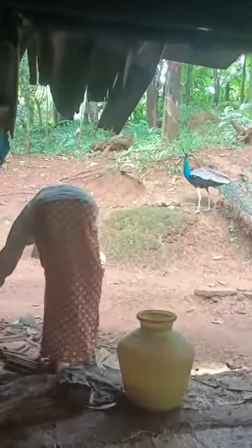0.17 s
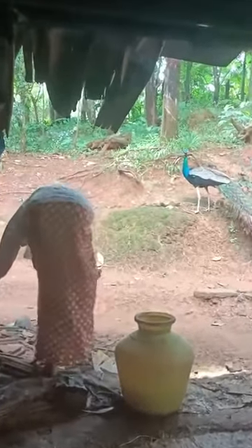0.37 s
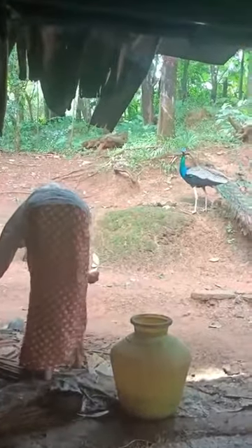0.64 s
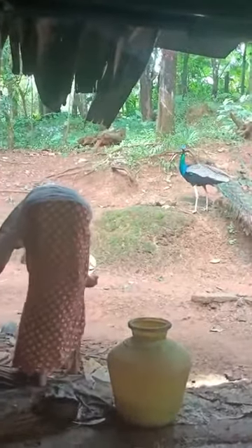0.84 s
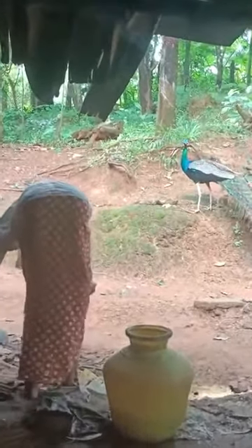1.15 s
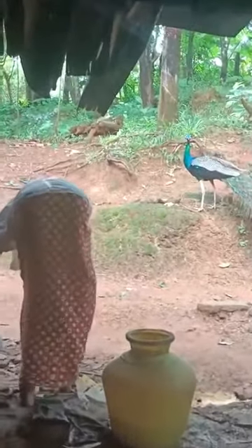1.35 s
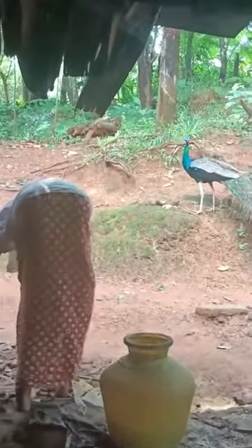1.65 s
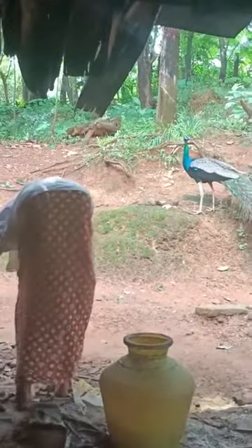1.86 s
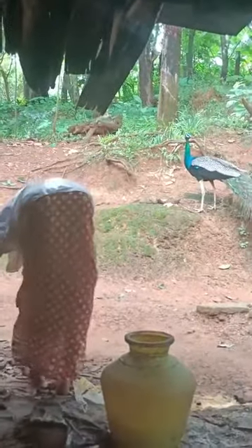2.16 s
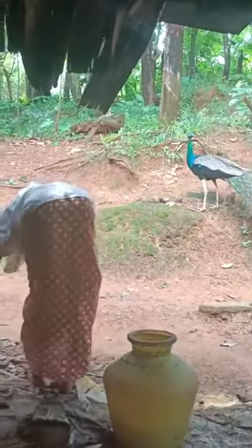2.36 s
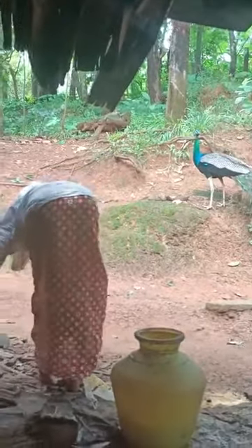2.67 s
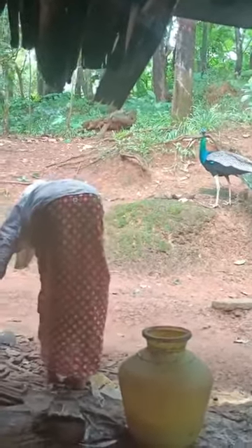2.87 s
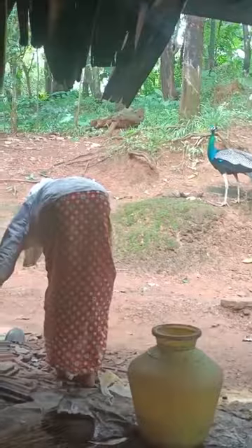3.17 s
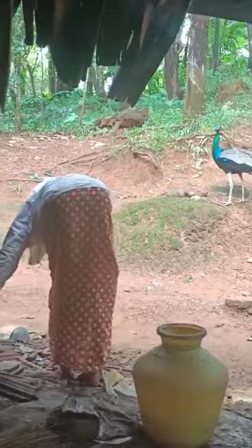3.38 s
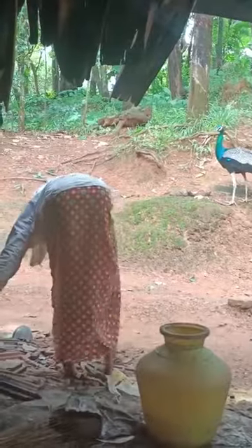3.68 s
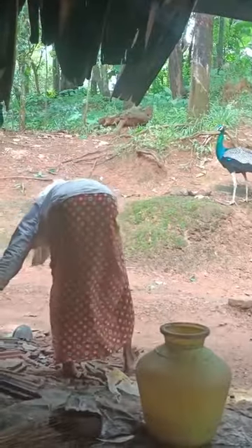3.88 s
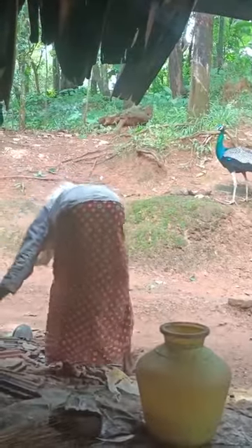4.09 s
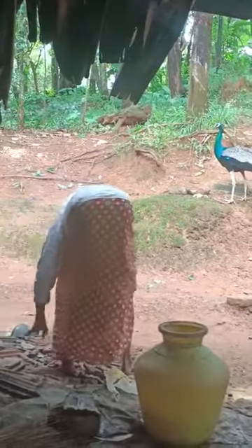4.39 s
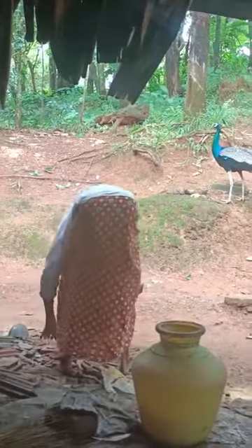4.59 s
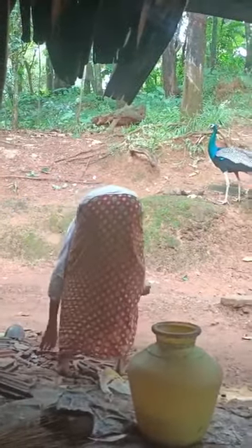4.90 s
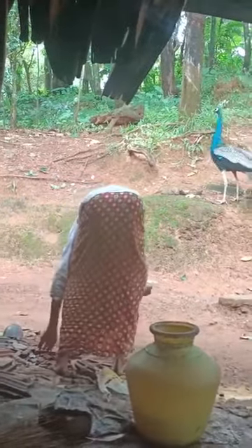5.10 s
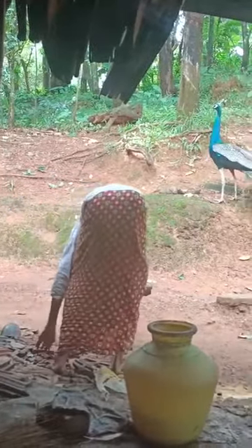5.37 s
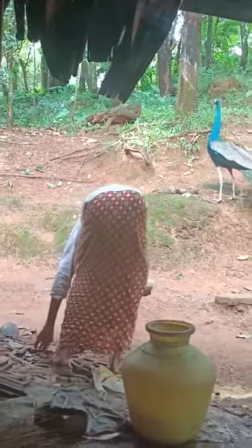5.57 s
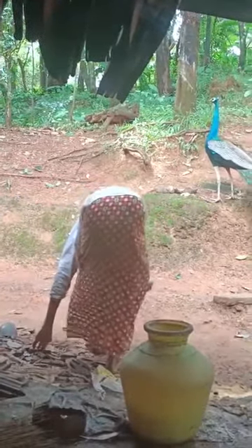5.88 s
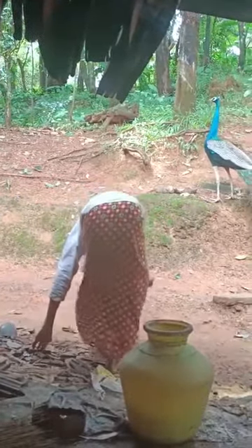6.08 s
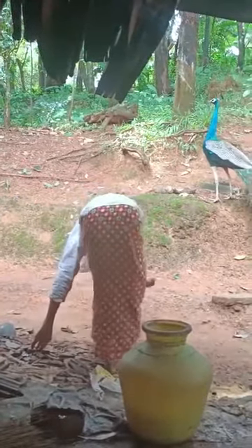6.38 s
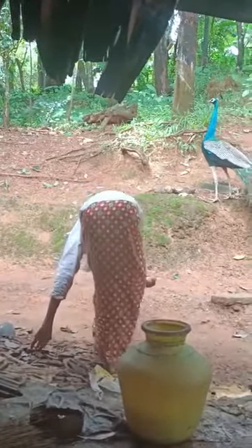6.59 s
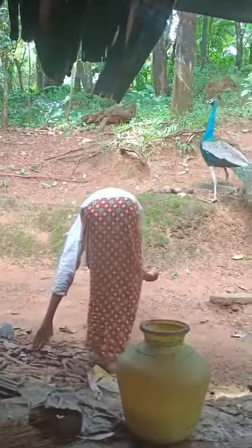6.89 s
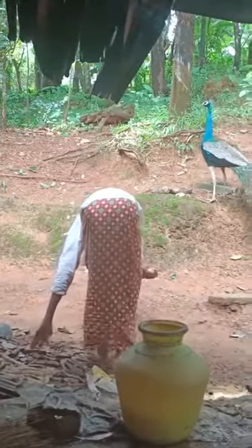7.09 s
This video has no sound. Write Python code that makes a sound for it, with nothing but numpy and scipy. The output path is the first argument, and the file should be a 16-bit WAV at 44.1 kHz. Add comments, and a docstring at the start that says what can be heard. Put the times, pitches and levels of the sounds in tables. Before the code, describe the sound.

A quiet outdoor yard heard from under a small shelter: steady soft leaf hiss with a faint low rumble, and short echoes around the birds. A close chick is already peeping at 0 seconds and peeps again at 0.4, a clear whistle near 5 kHz breaking and sliding to about 3 kHz. A low, hoarse hen clucks softly at 0.2, 1.2 and 1.7, then irregularly to the end, while further chicks give weaker, reedier peeps. A thin high hiss passes at 0.65. From 2.1 the near chick peeps steadily, at about 2.6, 3.3, 4.0, 4.7, 5.2, 6.3 and 6.8. Feet scuff dry litter faintly at 3.2 and more clearly at 3.6; a small twig crackles at 3.9. A faint scuff at 4.9 leads to a sharp, bright double snap at 5.0, then another thin hiss at 5.3. Peeps and clucks continue to the end.

```python
"""Under a lean-to in a quiet yard, trees hiss and a chick close by is already peeping as the scene opens.
From the first second a hen clucks softly, other chicks answer further off and a thin, high hiss passes;
from about two seconds the near chick peeps on steadily. Feet scuff dry litter past three seconds, a twig
snaps just before four, and near five come a scuff, a sharper snap and a second thin hiss. Chicks are
gliding whistles, the hen rings resonances, the rest is shaped noise; echoes answer, two ports listen."""
import sys
import numpy as np
from scipy import signal
from scipy.fft import rfft, irfft
from scipy.io import wavfile
from scipy.ndimage import uniform_filter1d

SR = 44100
rng = np.random.default_rng(int(sys.argv[2]) if len(sys.argv) > 2 else 0)


def log_audio(samples):
    """Write samples as a 16-bit WAV file to the path given in sys.argv[1]."""
    # one column per channel
    frames = np.atleast_2d(samples).T
    # limit to full scale, then quantise
    limited = np.clip(frames, -1, 1)
    pcm = np.round(limited * 32767).astype(np.int16)
    wavfile.write(sys.argv[1], SR, pcm)


N = 319725
EDGE_HZ = 15900  # top of the recorded band


def gain_of(db):
    """Decibels to an amplitude factor."""
    return 10 ** (np.asarray(db) / 20)


def evened(x):
    """Scales to rms 1."""
    return x / np.sqrt(np.mean(x ** 2) + 1e-20)


def read(points, hz):
    """Reads a table of frequency points on a log-frequency axis."""
    f, value = np.transpose(points)
    return np.interp(np.log(hz + 1), np.log(f + 1), value)


def add(mix, s, sound, pan_db):
    """Lays a sound into both channels; pan_db is left minus right."""
    at = round(s * SR)
    sound = sound[max(-at, 0):]
    part = mix[:, max(at, 0):][:, :len(sound)]
    part += gain_of([[pan_db / 2], [-pan_db / 2]]) * sound[:part.shape[1]]


def coloured(x, points):
    """Filters a signal by the spectrum of the table, then scales to rms 1."""
    colour = gain_of(read(points, np.fft.rfftfreq(len(x), 1 / SR)))
    return evened(irfft(rfft(x) * colour, len(x)))


def resonate(x, hz, width_hz):
    """Shifts the curve hz down to zero, smooths, and shifts back: a resonance of gain 1."""
    turn = np.exp(2j * np.pi * np.cumsum(hz) / SR)
    r = np.exp(-np.pi * width_hz / SR)
    return 2 * (turn * signal.lfilter([1 - r], [1, -r], x / turn)).real


def resonate_twice(x, hz, width_hz):
    """Two equal resonances in a row, for steeper skirts."""
    return resonate(resonate(x, hz, width_hz), hz, width_hz)


def columns(rows):
    """Joins the corners of a call into smoothed curves at the sample rate."""
    s, *values = np.transpose(rows)
    t = np.arange(s[0], s[-1], 1 / SR)
    return [uniform_filter1d(np.interp(t, s, v), size=150) for v in values]


def later(x, seconds):
    """Delays a signal by turning the phase of each frequency."""
    return irfft(rfft(x) * np.exp(-2j * np.pi * np.fft.rfftfreq(N, 1 / SR) * seconds), N)


# colour of the yard: (frequency [Hz], relative level per Hz [dB])
YARD_COLOUR = [(12, -14), (25, -3), (90, -1), (320, -4), (480, -4), (800, -9), (1600, -10), (2500, -4),
               (3450, -5), (4700, -6.5), (5800, -5), (6700, -11), (9600, -16), (13200, -15.5), (14500, -24),
               (15000, -26), (15900, -55)]
# left-right likeness of the yard: (frequency [Hz], correlation [-1 to 1])
YARD_LIKENESS = [(60, .99), (170, .9), (500, .66), (900, .28), (1300, 0), (1700, -.2), (2300, 0)]
# stereo balance of the yard: (frequency [Hz], left minus right [dB])
YARD_BALANCE = [(500, 0), (1400, 4), (2500, 1.5), (5500, 2), (7300, -3), (9000, 0), (11500, 3), (14000, 0)]
YARD_DB = -43.5  # rms over both channels


def yard():
    """Hiss of leaves and distant rumble: random short-time spectra with faint patches and a slow swell."""
    frames, hz = N // 256 + 5, np.fft.rfftfreq(1024, 1 / SR)
    a, b, c, d, patches = rng.standard_normal((frames, 513, 5)).T
    patches = uniform_filter1d(patches, size=10, axis=0)
    patches = evened(uniform_filter1d(patches, size=12, axis=1))
    t = np.arange(frames) * 256 / SR
    swell = evened(sum(np.sin(2 * np.pi * (f * t + rng.random())) / np.sqrt(f)
                       for f in np.geomspace(.15, 4, num=20)))
    same = read(YARD_LIKENESS, hz)[:, None]
    left = a + 1j * b
    right = same * left + np.sqrt(1 - same ** 2) * (c + 1j * d)
    lean = gain_of(read(YARD_BALANCE, hz) / 2)[:, None]
    level_db = read(YARD_COLOUR, hz)[:, None] + 1.2 * patches + .5 * swell
    spectra = np.array([left * lean, right / lean]) * gain_of(level_db)
    return gain_of(YARD_DB) * evened(signal.istft(spectra, nperseg=1024, noverlap=768)[1][:, :N])


# decay of the echoes off roof and walls: (frequency [Hz], time to fall by 60 dB [s])
SHELTER_DECAY = [(300, .24), (3000, .21), (8000, .19), (15000, .16)]


def shelter(x):
    """Sparse echoes of random sign, dying band by band; three tails trade places as if the birds moved."""
    out, size = np.zeros((2, N)), SR // 2
    for k in range(3):
        taps = np.zeros((2, size))
        # one echo in every 20 samples
        at = np.arange(120, size - 20, 20) + rng.integers(0, 20, (2, (size - 121) // 20))
        np.put_along_axis(taps, at, rng.choice([-1., 1.], at.shape), axis=1)
        hz, t, spectra = signal.stft(taps, SR, nperseg=256)
        decay = gain_of(-60 * t / read(SHELTER_DECAY, hz)[:, None])
        tail = signal.istft(spectra * decay, SR, nperseg=256)[1]
        share = np.sqrt(2 / 3) * np.cos(np.pi * (np.arange(N) / SR * .45 + k / 3))
        out += signal.fftconvolve(x * share, tail / np.linalg.norm(tail[0]), axes=1)[:, :N]
    return out


def hiss(length, hz, width_hz, level_db):
    """A short breath of noise in one high band, swelling and fading evenly."""
    size = round(length * SR)
    band = resonate_twice(rng.standard_normal(size), np.full(size, hz), width_hz)
    return gain_of(level_db) * evened(band) * np.hanning(size)


# thin, high hisses:
# (start [s], length [s], centre [Hz], width of each resonance [Hz], peak level [dB], left minus right [dB])
THIN_HISSES = [(0.636, 0.084, 11100, 900, -47.5, 3), (5.25, 0.079, 9900, 1200, -48, 6)]


def thin_hisses(mix):
    """Lays in the narrow bands of noise."""
    for s, *shape, pan_db in THIN_HISSES:
        add(mix, s, hiss(*shape), pan_db)


# colour of dry litter underfoot: (frequency [Hz], relative level per Hz [dB])
SCUFF_COLOUR = [(880, -47), (1500, -28), (3050, -2.5), (5140, -6), (7550, -0.5), (8750, -7.5), (13800, -8),
                (15800, -18)]


def scuff(rise, fall, level_db):
    """A bright swish of fine grains that swells and fades; the peak lies .2 s in."""
    t = np.arange(-.2, .3, 1 / SR)
    grains = rng.standard_normal(len(t)) * gain_of(2.5 * rng.exponential(1, len(t)))
    swell = np.exp(-.5 * (t / np.where(t < 0, rise, fall)) ** 2)
    return gain_of(level_db) * coloured(grains, SCUFF_COLOUR) * swell


# feet in the litter: (peak time [s], rise [s], fall [s], peak level [dB], left minus right [dB])
FOOT_SCUFFS = [(3.229, .015, 0.051, -44.5, -2), (3.62, 0.035, 0.022, -32.5, -1.5),
               (4.94, 0.017, 0.035, -43.5, -2)]


def foot_scuffs(mix):
    """Lays in each stroke of a foot, placed by its peak."""
    for s, *shape, pan_db in FOOT_SCUFFS:
        add(mix, s - .2, scuff(*shape), pan_db)


# colour of splitting wood: (frequency [Hz], relative level per Hz [dB])
SNAP_COLOUR = [(710, -57), (1200, -44), (1950, -11), (3130, 0.5), (7840, -1), (8450, -9.5), (11400, -5),
               (14000, -10), (15800, -26)]


def snap(level_db, length):
    """A sudden crackle of fibres, in bursts that trail off; the onset lies .05 s in."""
    t = np.arange(-.05, .2, 1 / SR)
    bursts = gain_of(2.5 * evened(uniform_filter1d(rng.standard_normal(len(t)), size=60)))
    shape = np.clip(t / .001, 0, 1) * np.exp(-abs(t / length) ** 3)
    return gain_of(level_db) * coloured(rng.standard_normal(len(t)), SNAP_COLOUR) * bursts * shape


# cracks of twigs: (onset [s], level before bursts [dB], crackle length [s], left minus right [dB])
TWIG_SNAPS = [(3.888, -35, .008, -1), (3.899, -35.5, 0.011, 7), (5.0, -22, 0.0048, 8),
              (5.0036, -20.5, 0.0082, 0), (5.014, -23.5, 0.0082, 7), (5.03, -32, .006, -6)]


def twig_snaps(mix):
    """Lays in each crack of a snapping twig, placed by its onset."""
    for s, *shape, pan_db in TWIG_SNAPS:
        add(mix, s - .05, snap(*shape), pan_db)


CLUCK_RISE_DB, CLUCK_FALL_DB = -9.5, -16  # effort at the start and at the end, relative to the peak
CLUCK_SAG = .06  # share by which the pitch sinks through a cluck


def cluck_rows(rise, fall, effort_db, hz, throat_hz):
    """The corners of one cluck: (time [s], effort [dB], pitch [Hz], throat [Hz])."""
    return [(0, effort_db + CLUCK_RISE_DB, hz * (1 + CLUCK_SAG / 2), throat_hz),
            (rise, effort_db, hz, throat_hz),
            (rise + fall, effort_db + CLUCK_FALL_DB, hz * (1 - CLUCK_SAG / 2), throat_hz)]


def cluck(rows, odd, chest_db, rough):
    """Uneven pulses and puffs of air ring the throat, the chest and, weakly, the beak."""
    effort_db, hz, throat_hz = columns(rows)
    wobble = uniform_filter1d(rng.standard_normal(len(hz)), size=200)
    turns = np.cumsum(hz * (1 + 0.15 * wobble)) / SR
    # only the odd harmonics, fundamental included, are scaled by odd
    pulses = sum(odd ** (k % 2) * np.cos(2 * np.pi * k * turns) for k in range(1, 8))
    puffs = (0.27 + np.exp(-(turns % 1) / 0.45)) * rng.standard_normal(len(hz))
    drive = (1 - rough) * evened(pulses) + rough * 4.0 * evened(puffs)
    throat = resonate_twice(drive, throat_hz, 300.0)
    beak = resonate_twice(drive, np.full(len(hz), 1300.0), 600.0)
    chest = resonate_twice(drive, np.full(len(hz), 410.0), 260.0)
    voice = evened(throat - gain_of(-13) * beak + gain_of(chest_db) * chest)
    return gain_of(effort_db) * voice * signal.windows.tukey(len(hz), .3)


# the hen: (peak time [s], rise [s], fall [s], peak effort [dB], pitch at the peak [Hz], throat [Hz],
#   strength of odd harmonics [0-1], chest gain relative to throat [dB], hoarseness [0-1])
HEN_CLUCKS = [ (.218, .04, 0.054, -40.5, 267.6, 780, 0.7, -4.5, 0.76),
              (1.18, .022, 0.089, -41, 295.7, 705, 0.6, -1.5, 0.51),
              (1.668, .05, 0.032, -42, 292.8, 785, 1, 1.5, 0.38),
              (1.965, .017, 0.06, -45.5, 229.3, 700, 0.6, -4, .5),
              (2.09, .03, .06, -40.5, 321.5, 680, 0.7, -0.5, 0.71),
              (3.045, .04, 0.06, -42.5, 269, 769, 1, -2.5, 0.46),
              (3.16, .022, 0.051, -44.5, 289, 580, .62, 0, 0.65),
              (3.495, .025, 0.063, -41.5, 240.6, 725, 0, -1, 0.31),
              (3.782, .055, 0.043, -41.5, 270.7, 560, 0.46, -5, 0.54),
              (4.055, .055, 0.025, -39.5, 262, 515, .44, -13, 0.37),
              (4.475, .055, 0.1, -44.5, 277.7, 634, 0.1, -0.5, 0.37),
              (4.63, .02, 0.043, -46.5, 318.4, 613, .54, 2, 0.45),
              (5.09, .05, 0.048, -40.5, 262.4, 913, 0.7, -10, 0.36),
              (5.594, .045, 0.043, -39, 251.9, 730, 0.9, -3.5, 0.4),
              (6.002, .06, 0.03, -40.5, 255.7, 750, 1, -2, 0.37),
              (6.555, .03, 0.027, -48.5, 262, 940, 0, -9, 0.37),
              (6.692, .05, 0.04, -39, 289.3, 1030, 0.9, -5, 0.46), ]


def hen_clucks(mix):
    """Lays in the soft clucks, a little to the left, placed by their peaks."""
    for s, rise, fall, effort_db, hz, throat_hz, *voice in HEN_CLUCKS:
        rows = cluck_rows(rise, fall, effort_db, hz, throat_hz)
        add(mix, s - rise, cluck(rows, *voice), pan_db=1.5)


FLICK_S, FLICK_DB = 0.016, -12  # opening flick: length [s], starting level relative to the high note [dB]
# the pitch hangs early in the break, where the breath may catch, then tumbles:
# (share of the break's length, share of its change in pitch)
CATCH, TUMBLE = (.42, .22), (.6, 0.65)
TUMBLE_DB = -1.5  # level at the tumble, relative to the start of the slide
# after the drop: length [s], last pitch as a share of the low note, last level relative to it [dB]
FADE_S, FADE_TO, FADE_DB = .024, .88, -12


def peep_rows(flick_from, hold, fall, slide, drop, high_hz, from_hz, to_hz, low_hz,
              high_db, from_db, to_db, low_db, catch_db):
    """The corners of one peep: (time [s], pitch [Hz], level [dB])."""
    slide_start = hold + fall
    slide_end = slide_start + slide
    low = slide_end + drop
    caught, tumbled = ((hold + when * fall, high_hz + share * (from_hz - high_hz))
                       for when, share in (CATCH, TUMBLE))
    return [(0, flick_from * high_hz, high_db + FLICK_DB),
            (FLICK_S, high_hz, high_db),
            (hold, high_hz, high_db),
            (*caught, high_db + catch_db),
            (*tumbled, from_db + TUMBLE_DB),
            (slide_start, from_hz, from_db),
            (slide_end, to_hz, to_db),
            (low, low_hz, low_db),
            (low + FADE_S, FADE_TO * low_hz, low_db + FADE_DB)]


# beak colour: (frequency [Hz], overtone level relative to the whistle, before reed and mix [dB])
BEAK_COLOUR = [(5400, -24), (6000, -22.5), (6600, -32), (7500, -19), (8300, -23.5), (9300, -73),
               (11000, -25), (12700, -54), (14500, -45)]


def peep(rows, reed_db, flutter_db):
    """A gliding, slightly unsteady whistle and its overtones; the breath flutters a little."""
    hz, level_db = columns(rows)
    flutter, quiver = (evened(uniform_filter1d(uniform_filter1d(v, size=100), size=100))
                       for v in rng.standard_normal((2, len(hz))))
    phase = 2 * np.pi * np.cumsum(hz * (1 + .01 * quiver)) / SR
    overtones = np.zeros(len(hz))
    for k, db in zip((2, 3, 4), reed_db):
        in_band = k * hz < EDGE_HZ
        overtones += gain_of(db + read(BEAK_COLOUR, k * hz)) * in_band * np.sin(k * phase)
    breath = gain_of(level_db + flutter_db * flutter) * signal.windows.tukey(len(hz), .12)
    breath = np.sqrt(2) * breath  # levels are rms
    return breath * np.sin(phase), breath * overtones


def lay_peeps(mix, overtones, peeps, flick_from, reed_db):
    """Lays whistles and overtones into separate mixes, since they radiate differently."""
    for s, *shape, pan_db in peeps:
        whistle, upper = peep(peep_rows(flick_from, *shape), reed_db, flutter_db=2.5)
        add(mix, s, whistle, pan_db)
        add(overtones, s, upper, pan_db)


# the other chicks, the first breaking upward: (start [s], hold to the break [s], break [s], slide [s],
#   drop [s], high [Hz], slide from [Hz], slide to [Hz], low [Hz], high [dB], slide from [dB],
#   slide to [dB], low [dB], gain early in the break relative to high [dB], left minus right [dB])
FAR_CHICK_PEEPS = [ (0.209, .016, .03, .115, 0.0298, 2943, 3695, 3530, 3190, -43, -42.5, -36.5, -44, -3, 1),
                   (0.777, .045, 0.033, .035, 0.028, 4370, 3400, 3074, 2830, -43.5, -40.5, -32, -47.5, -16, 0.5),
                   (.98, 0.036, .06, 0.043, 0.028, 5230, 4600, 4240, 3980, -51.5, -51, -49, -52, -5, 2),
                   (1.531, 0.035, 0.022, 0.018, 0.016, 4270, 3950, 3780, 3600, -43, -40, -50, -56, 3, -1),
                   (1.618, .02, .024, .025, .02, 3180, 3060, 2940, 2790, -33, -40, -41, -47, -1, 4),
                   (2.918, 0.024, 0.022, 0.021, 0.019, 4590, 4450, 4420, 4370, -49, -48, -45, -57, 2, 4),
                   (4.22, 0.023, 0.043, 0.025, 0.028, 3470, 3290, 2970, 2840, -43, -47, -45.5, -51, -1, 3),
                   (4.504, 0.047, 0.034, 0.0096, 0.0084, 4385, 3000, 2870, 2760, -43, -46.5, -40, -59, -8, 2.5),
                   (5.505, .03, 0.036, .035, 0.0302, 4526, 3716, 3394, 3170, -41, -46, -39.5, -45.5, -7, 2),
                   (6.2, 0.028, 0.048, 0.057, 0.048, 4800, 3780, 3525, 3580, -44.5, -38.5, -33.5, -34, -4, 0.5),
                   (6.529, .055, 0.055, 0.014, 0.014, 5780, 3650, 3430, 3050, -39.5, -39, -34, -53, -3, 2.5),
                   (7.155, .035, 0.028, 0.017, 0.017, 4780, 4450, 4400, 4400, -40, -39.5, -40, -41, -1, 5.5),
                   ]


def far_chicks(mix, overtones):
    """Further chicks: a reedy second overtone, little above it, and hardly any opening flick."""
    # flick_from: first pitch as a share of the high note; reed_db: gain of overtones 2, 3 and 4
    lay_peeps(mix, overtones, FAR_CHICK_PEEPS, flick_from=0.96, reed_db=[10, -2, -10])


# the near chick: (start [s], hold to the break [s], break [s], slide [s],
#   drop [s], high [Hz], slide from [Hz], slide to [Hz], low [Hz], high [dB], slide from [dB],
#   slide to [dB], low [dB], gain early in the break relative to high [dB], left minus right [dB])
NEAR_CHICK_PEEPS = [ (-.06, 0.059, 0.043, 0.041, .016, 4780, 4155, 3595, 2830, -31, -32, -32.5, -32, -12, 2.5),
                    (0.394, .035, .027, 0.073, 0.034, 5180, 4237, 3690, 2990, -39, -24, -24, -16, -2, 2),
                    (2.089, .025, 0.035, 0.074, 0.023, 4750, 4027, 3500, 2962, -40.5, -31, -35.5, -24, 2, 1),
                    (2.627, .034, .034, .058, .03, 5020, 4060, 3790, 3120, -28, -26, -27.5, -18, -11, 2),
                    (3.31, 0.037, 0.023, .11, .013, 4910, 4093, 3430, 2938, -38.5, -27.5, -21, -20, 5, 3),
                    (4.008, 0.034, 0.031, 0.1, 0.015, 4940, 4320, 3360, 3017, -37.5, -27.5, -22.5, -15.5, 11, 2.5),
                    (4.69, .04, .038, .093, 0.0107, 5020, 4050, 3452, 3036, -37, -24.5, -17.5, -19.5, 13, 2),
                    (5.244, 0.036, 0.037, .104, 0.0093, 5020, 4040, 3260, 2903, -36.5, -26, -23, -22, 8, 1),
                    (6.271, 0.029, 0.079, 0.035, .024, 4970, 3760, 3534, 3037, -43, -21, -19, -15.5, 17.5, 1),
                    (6.84, 0.033, 0.023, 0.089, 0.027, 5100, 4294, 3750, 3046, -39, -29, -21.5, -16, 2, 1.5),
                    ]


def near_chick(mix, overtones):
    """The close chick: each peep flicks up from well below, breaks, slides and drops."""
    lay_peeps(mix, overtones, NEAR_CHICK_PEEPS, flick_from=.75, reed_db=[1, 0, -1])


def scene():
    """All sources with their echoes; overtones beam away from the microphone and arrive mostly as echoes."""
    near, far, overtones, hen, litter = np.zeros((5, 2, N))
    thin_hisses(litter)
    foot_scuffs(litter)
    twig_snaps(litter)
    hen_clucks(hen)
    far_chicks(far, overtones)
    near_chick(near, overtones)
    birds = gain_of(-2) * near + gain_of(2) * far + gain_of(6) * overtones + gain_of(-3) * hen
    echoes = shelter(birds + gain_of(-6) * litter)
    direct = near + far + gain_of(-3) * overtones + hen + litter
    # direct sound comes from the side and reaches the right port .07 ms later
    ports = np.array([direct[0], later(direct[1], .00007)])
    return ports + echoes + yard()


def record(dry):
    """The band limit of the recorder: a steep low-pass."""
    low_pass = signal.firwin(511, EDGE_HZ, window=("kaiser", 9), fs=SR)
    return signal.oaconvolve(dry, low_pass[None], "same")


dry = scene()
out = record(dry)
log_audio(out)
```